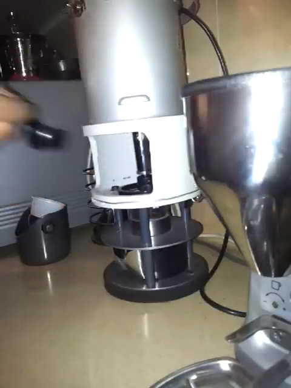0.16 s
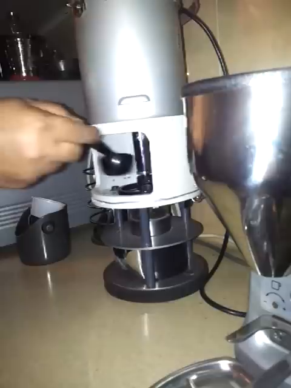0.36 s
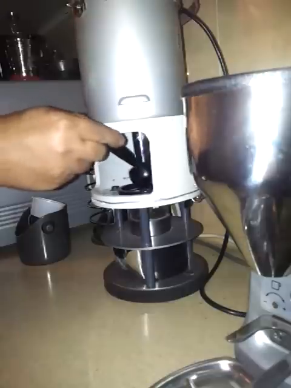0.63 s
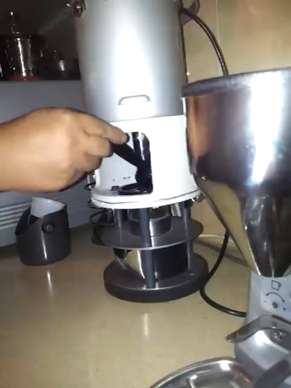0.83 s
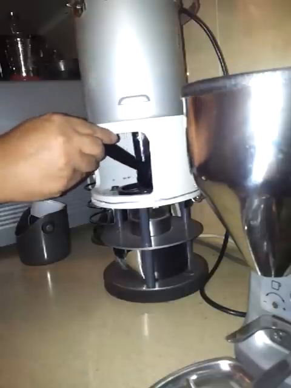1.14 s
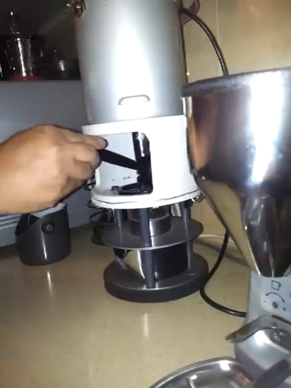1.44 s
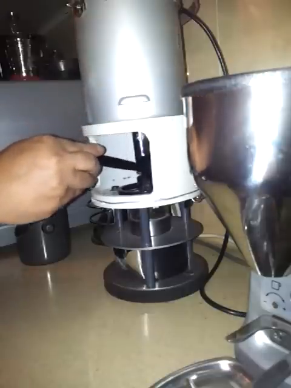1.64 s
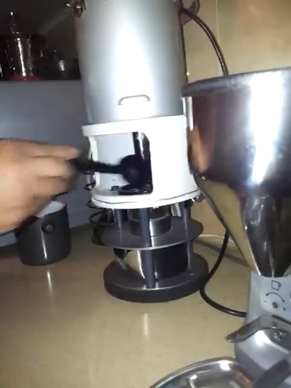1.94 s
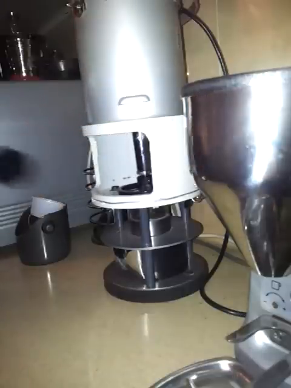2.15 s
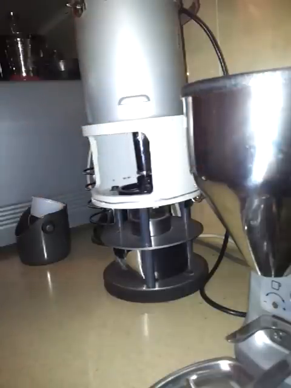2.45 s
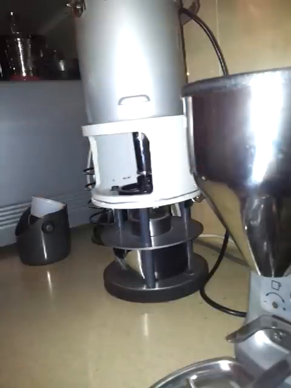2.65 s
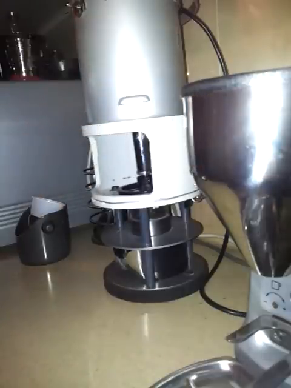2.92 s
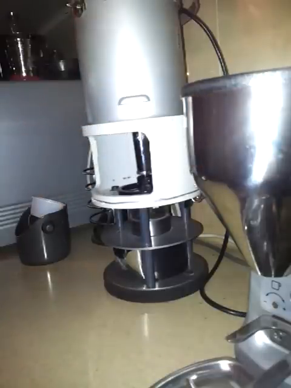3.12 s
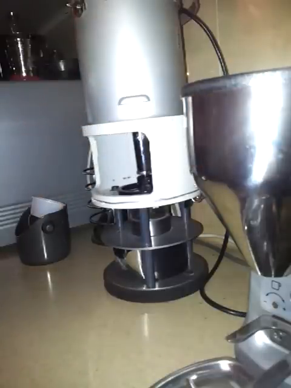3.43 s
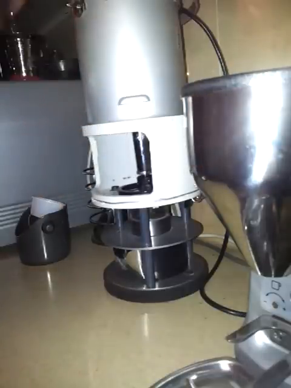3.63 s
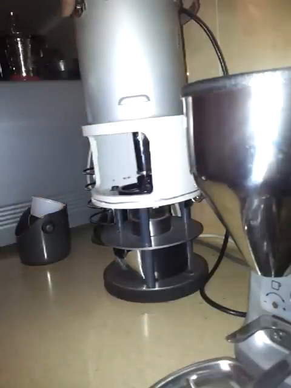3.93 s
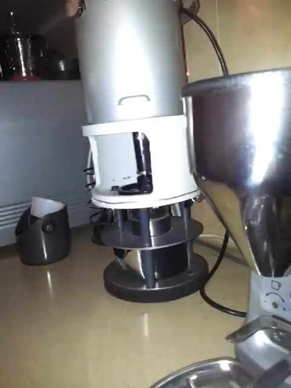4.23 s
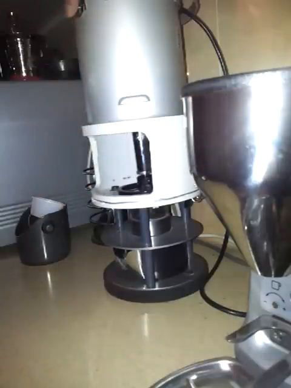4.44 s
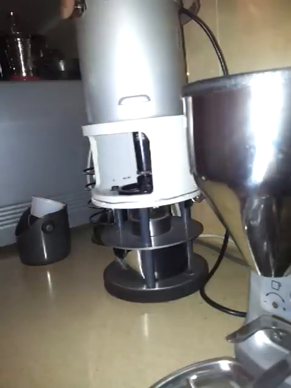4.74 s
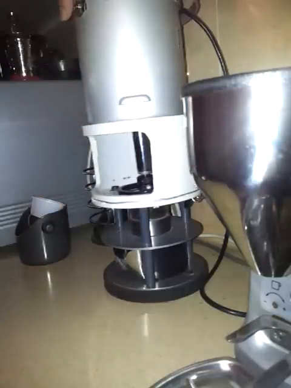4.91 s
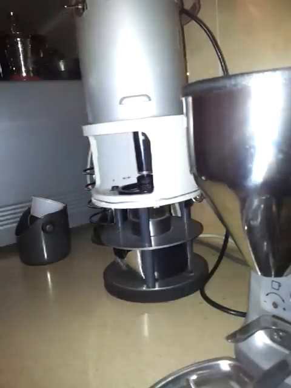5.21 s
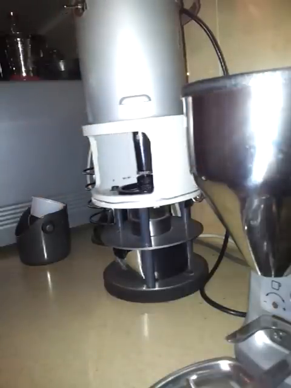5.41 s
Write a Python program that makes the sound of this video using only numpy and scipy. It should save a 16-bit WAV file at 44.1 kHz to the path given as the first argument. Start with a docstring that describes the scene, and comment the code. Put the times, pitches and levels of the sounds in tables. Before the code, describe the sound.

A plastic scoop scrapes and ticks, something thuds on the counter, steel clinks, then a coffee grinder snaps on with a harsh crunching drone.

```python
"""Coffee grinder at close range

Over soft hiss and hum, a plastic scoop rubs, skips and knocks: random slips and impulses excite short noise responses.
Thuds, steel clinks, taps and snaps follow as impulses exciting damped modes and decaying noise.
The motor then starts: a modulated gear tone drones ever louder and shaken housing resonances sound with it,
while random fractures make the crunch of the burrs, loud at first and slowly easing."""
import sys
import numpy as np
from scipy import signal
from scipy.fft import rfft, irfft, next_fast_len
from scipy.io import wavfile

SR = 44100
rng = np.random.default_rng(int(sys.argv[2]) if len(sys.argv) > 2 else 0)


def put_to_file(sound):
    """Save the sound as 16-bit audio at rate SR, in the file named by the first command-line argument."""
    columns = np.atleast_2d(sound).T  # one column per channel
    safe = np.clip(columns, -1, 1)
    whole_steps = np.round(safe * 32767)
    wavfile.write(sys.argv[1], SR, whole_steps.astype(np.int16))


N = 245637

# Event levels, mode levels and spectra are relative: each source applies its own gain.
# background hiss, its level moving slowly, before a common gain: [t/s, level/dB]
HISS = [(0.2, -49.5), (0.65, -51.5), (1.9, -50), (2.15, -48.5), (2.85, -48), (3.9, -49), (4.7, -52)]
# mains hum: [f/Hz, level/dB]
HUM = [(59.5, -67.5), (119.5, -67)]
# background hiss spectrum: [f/Hz, level/dB per Hz]
HISS_SPECTRUM = [(20, -2), (55, -1.5), (170, -2), (560, 0.5), (1300, -10.5), (2100, -11), (2500, -4),
                 (3300, -12), (5000, -7), (7000, -12.5), (11500, -14), (14500, -21.5)]

# scoop pushed in, then drawn out: [t/s of the hardest rub, level/dB, swell and fade/(dB/s)]
STROKES = [(1.221, -33.5, 82), (1.599, -28.5, 126)]
# single plastic ticks of the scoop: [t/s, level/dB]
TICKS = [(1.002, -23), (1.088, -19), (1.131, -19.5), (1.5078, -19), (1.5256, -12), (1.5606, -11.5),
         (1.5832, -11), (1.5978, -12), (1.7147, -18.5), (1.962, -30.5)]
# scoop knocking on the housing: [t/s, level/dB]
KNOCKS = [(0.7964, -32.5), (1.4431, -18)]
# spectra of scoop and knock: [f/Hz, level/dB per Hz]
SCOOP_SPECTRUM = [(1800, -29), (3300, -15.5), (5100, 3), (5800, -3.5), (6500, 2.5), (7400, -8), (9300, -3),
                  (11200, -2), (12300, -13), (14500, -12.5)]
KNOCK_SPECTRUM = [(900, -23), (1350, -9), (1750, -27), (2450, 6), (3050, 4), (3500, -18), (14000, -30)]
# the scoop rubs along the opening only between these times, in s
RUB_START_S, RUB_END_S = 0.99, 1.86
# even skips along the rim: first time and spacing in s, level and extra level of the first in dB
SKIP_START_S, SKIP_GAP_S = 1.1712, 0.0672
SKIP_DB, FIRST_CATCH_DB = -16.5, 8

# broadband snaps: a faint tick with the scoop's first knock, hard snaps,
# then the starting jolt: [t/s, level/dB]
SNAPS = [(0.7966, -34.5), (4.0745, -7), (4.077, -3.5), (4.080, -10.5), (4.7502, 0), (4.753, 1),
         (4.7575, 1.5)]
# spectrum of snaps and settling taps: [f/Hz, level/dB per Hz]
SNAP_SPECTRUM = [(70, -12), (250, -6.5), (550, -5), (2400, -8), (5500, 0), (8500, -3.5), (12000, -2.5),
                 (14500, -8.5)]

# dull blows on the counter: [t/s, level/dB]
THUDS = [(2.8732, -5.5), (2.884, -12.5), (3.023, -20.5)]
# booms of the counter top: [t/s, level/dB]
BOOMS = [(2.874, -32), (3.214, -25)]
# spectrum of a thud: [f/Hz, level/dB per Hz]
THUD_SPECTRUM = [(30, -45), (90, -7), (240, -5), (580, 2.5), (880, 1), (1400, -11.5), (2100, -19),
                 (2900, -36.5), (4300, -28.5), (6400, -36), (14000, -42.5)]
# modes of the counter top and the ware on it: [f/Hz, level/dB, t60/s]
COUNTER_MODES = [(443, 0.5, 1), (817, 4, 0.13)]

# steel parts meeting: [t/s, level/dB, favoured f/Hz]
CLINKS = [(3.157, -33.5, 1660), (3.1705, -11, 5050), (3.179, -11, 1560), (3.277, -12, 3230),
          (3.340, -14.5, 3400), (3.368, -26.5, 2640), (3.420, -22, 1540)]
# spectrum of a clink: [f/Hz, level/dB per Hz]
CLINK_SPECTRUM = [(120, -16), (390, -6), (900, -15.5), (2100, -27), (3200, -11.5), (3850, -23.5),
                  (5200, -8.5), (7000, -27.5), (11500, -13), (14500, -25.5)]
# modes of the steel: [f/Hz, level/dB, t60/s]
STEEL_MODES = [(1569.5, -0.5, 0.85), (1590, -4.5, 0.72), (2624, -8, 0.91), (3165, 4, 0.27),
               (3380, -4.5, 0.17), (5109, 0.5, 0.75), (5450, -1, 1), (10710, -7, 0.52)]
# loose parts settling: [t/s, level/dB]
TAPS = [(3.5892, -30.5), (3.86, -33.5), (4.37, -34.5), (4.5852, -38)]
# modes of the small loose parts: [f/Hz, level/dB, t60/s]
LOOSE_MODES = [(2990, -2, 0.27), (3990, -2, 0.18), (5630, 1, 0.39), (11500, -24, 0.13)]

# single hard cracks between the burrs: [t/s, level/dB]
CRACKS = [(4.752, -1), (4.809, -6.5), (4.904, -6), (4.926, -8.5)]
# a hard bean jams the burrs for a moment: [t/s, width at 1/e/s, crunch lift/dB, drone lift/dB]
BITES = [(4.82, 0.096, 2, 6), (4.978, 0.043, 5.5, 0), (5.103, 0.046, 2.5, 14), (5.217, 0.078, 4.5, 11.5),
         (5.292, 0.028, -0.5, 9.5), (5.393, 0.053, 3, 1)]
# spectra of the crunch and of its bright splinters: [f/Hz, level/dB per Hz]
CRUNCH_SPECTRUM = [(50, -7.5), (220, -2.5), (370, -4.5), (950, 1.5), (1800, -2), (2800, -2.5), (3900, -1),
                   (5000, -1), (6700, 0.5), (7700, -9), (14500, -27)]
SPLINTER_SPECTRUM = [(5000, -31), (8000, 3.5), (11000, 4), (12100, 2), (12700, 1), (14500, -14.5)]
# resonances of the burr carrier: [f/Hz, width at half lift/Hz, lift/dB]
CARRIER = [(3780, 200, 9), (5760, 140, 5.5), (6750, 320, 9.5), (12200, 260, -2)]
# resonances of the grinder housing: [f/Hz, half bandwidth of each of two filters/Hz, level/dB]
HOUSING = [(471.5, 10, -12), (518, 24, -3), (544, 24, -0.5), (595, 18, -4), (675, 21, -8), (1307, 78, -8.5)]
START_S = 4.78
MESH_HZ = 541.3  # rate at which the gear teeth meet
# levels at the start, and their trends
CRUNCH_DB, CRUNCH_EASE_DB_PER_S = -21.5, 3
SPLINTER_DB, SPLINTER_EASE_DB_PER_S = -26.5, 6
DRONE_DB, DRONE_GROWTH_DB_PER_S = -31.5, 5
# shares of the bite lifts passed on to the splinters
SPLINTER_FOLLOWS_CRUNCH, SPLINTER_FOLLOWS_DRONE = .4, 0.27

# the two microphone ports: [f/Hz, left-right level/dB] and [f/Hz, left-right correlation]
BALANCE = [(100, 7), (700, 6), (1280, -3), (2400, -2), (4500, -11.5), (8000, 0), (11500, 14), (14500, 11)]
LIKENESS = [(500, -0.62), (900, 0.21), (1400, 0.059), (3000, -0.0025)]
ROOM_T60_S, ROOM_TREBLE_T60_S, ROOM_SPLIT_HZ = 0.7, 0.54, 6200
CUTOFF_HZ = 14500


def from_db(db):
    """Decibel law: amplitude gain is 10^(dB/20)."""
    return 10 ** (np.asarray(db) / 20)


def rms_one(x):
    """Normalisation: the mean of the channels gets rms 1."""
    return x / np.sqrt(np.mean(np.atleast_2d(x).mean(0) ** 2) + 1e-20)


def in_time(rows):
    """Linear interpolation: each column of a curve at every sample."""
    s, *columns = np.transpose(rows)
    return [np.interp(np.arange(N) / SR, s, c) for c in columns]


def at_hz(points, hz):
    """Interpolation on a logarithmic frequency axis."""
    f, value = np.array(points).T
    return np.interp(np.log(hz + 1e-9), np.log(f), value)


def drift(rate):
    """Low-passed noise: a double pole at rate (Hz) gives slow fluctuation of rms 1."""
    step, settle = 40, 2000  # samples per slow step; slow steps dropped
    r = np.exp(-2 * np.pi * rate * step / SR)
    slow = signal.lfilter([1], [1, -2 * r, r * r], rng.standard_normal(N // step + settle + 2))[settle:]
    return np.interp(np.arange(N) / step, np.arange(len(slow)), rms_one(slow))


def dying(t60):
    """Exponential damping: one second of decay, falling 60 dB in t60."""
    return from_db(-60 * np.arange(SR) / SR / t60)


def ports(hz, turn):
    """Interchannel level and phase: complex gains of a wave whose phase differs by turn."""
    lean = from_db(at_hz(BALANCE, hz) / 2)
    return np.array([lean * np.ones_like(turn), np.exp(1j * turn) / lean])


def tone(hz, phase):
    """Sinusoid at two ports: the cosine of the phase difference is the correlation; rms 1."""
    turn = np.arccos(np.clip(at_hz(LIKENESS, hz), -1, 1))
    return rms_one(np.real(ports(hz, turn)[:, None] * np.exp(1j * phase)))


def noise(spectrum, size=N, peaks=()):
    """Spectral shaping: partly correlated stereo noise with resonant lifts; rms 1."""
    padded = next_fast_len(size)
    hz = np.fft.rfftfreq(padded, 1 / SR)
    lifts = sum(lift / (1 + (2 * (hz - f) / width) ** 2) for f, width, lift in peaks)
    level_db = at_hz(spectrum, hz) + lifts
    alike = np.clip(at_hz(LIKENESS, hz), -1, 1)
    mid, side = rfft(rng.standard_normal((2, padded)))
    pair = np.sqrt(1 + alike) * mid + np.sqrt(1 - alike) * side * [[1], [-1]]
    return rms_one(irfft(pair * from_db(level_db) * ports(hz, 0 * hz), padded)[:, :size])


def response(spectrum, t60, room_db, peaks=()):
    """Impulse response: dense damped modes, then a room tail whose treble dies first."""
    body, tail = noise(spectrum, SR, peaks), noise(spectrum, SR)
    lowpass = signal.butter(2, ROOM_SPLIT_HZ, fs=SR, output="sos")
    dull = signal.sosfiltfilt(lowpass, tail)
    room = dull * dying(ROOM_T60_S) + (tail - dull) * dying(ROOM_TREBLE_T60_S)
    onset = 1 - dying(0.0069)
    return (body * dying(t60) + from_db(room_db) * room) * onset


def clicks(events):
    """Impulsive excitation: one unit sample scaled by each row's level."""
    out = np.zeros(N)
    s, db = np.transpose(events)
    out[np.round(s * SR).astype(int)] = from_db(db)
    return out


def play(force, answer):
    """Linear superposition: a force is convolved with a body's stereo response."""
    return signal.fftconvolve(force[None], answer, axes=1)[:, :N]


def blows(events, spectrum, t60, room_db, gain_db):
    """Noise bursts: each blow gets a freshly drawn response, any favoured pitch lifted."""
    out = np.zeros((2, N + SR))
    pitch_width_hz, pitch_lift_db = 220, 13
    for s, db, *pitch in events:
        at = round(s * SR)
        peaks = [(hz, pitch_width_hz, pitch_lift_db) for hz in pitch]
        out[:, at:at + SR] += from_db(db + gain_db) * response(spectrum, t60, room_db, peaks)
    return out[:, :N]


def ringing(events, modes, gain_db):
    """Modal decay: modes near a favoured pitch ring strongest; reflections make each waver."""
    out, t = 0, np.arange(SR) / SR
    away_db, reach_hz = -8, 200
    for hz, db, t60 in modes:
        hits = []
        for s, level_db, *pitch in events:
            loss_db = sum(away_db * np.tanh(abs(hz - f) / reach_hz) for f in pitch)
            hits.append((s, level_db + loss_db))
        # real part wavers the phase, imaginary part the amplitude
        waver = .7 * drift(22)[:SR] + .4j * drift(22)[:SR]
        mode = tone(hz, 2 * np.pi * hz * t + waver) * dying(t60)
        out = out + from_db(db + gain_db) * play(clicks(hits), mode)
    return out


def grains(per_s, spread_db):
    """Random point process: many weak impulses, a few strong, of either sign."""
    sizes_db = spread_db * np.minimum(rng.exponential(1, N), 4)
    sizes = from_db(sizes_db) * rng.choice([-1, 1], N)
    return sizes * (rng.random(N) < per_s / SR)


def kitchen():
    """Background: broadband hiss of slowly changing level plus sinusoidal mains hum."""
    t = np.arange(N) / SR
    hum = sum(from_db(db) * tone(hz, 2 * np.pi * hz * t) for hz, db in HUM)
    return hum + from_db(in_time(HISS)[0] - 1.5) * noise(HISS_SPECTRUM)


def scoop_ticks(count=4):
    """Periodic catching: even skips along the rim, the first hardest, plus single ticks."""
    skips = []
    for k in range(count):
        skips.append((SKIP_START_S + k * SKIP_GAP_S, SKIP_DB + FIRST_CATCH_DB * (k == 0)))
    return skips + TICKS


def scoop(draws=3):
    """Stick-slip friction: tiny random slips, with ticks on edges and housing knocks."""
    t = np.arange(N) / SR
    strokes = sum(from_db(db - fade * abs(t - s)) for s, db, fade in STROKES)
    rubbing = strokes * (t > RUB_START_S) * (t < RUB_END_S)
    slips = 0
    for draw in range(draws):  # several random responses even out the colour
        body = response(SCOOP_SPECTRUM, t60=0.022, room_db=-19.5)
        slips = slips + play(grains(per_s=150, spread_db=6.0), body)
    ticks = blows(scoop_ticks(), SCOOP_SPECTRUM, t60=0.049, room_db=-16.5, gain_db=-9.5)
    knocks = blows(KNOCKS, KNOCK_SPECTRUM, t60=0.059, room_db=-21, gain_db=-2.0)
    return rubbing * rms_one(slips) + ticks + knocks


def snaps():
    """Broadband impact: brief contacts excite a wide, quickly damped spectrum."""
    return blows(SNAPS, SNAP_SPECTRUM, t60=0.05, room_db=-19.5, gain_db=-6.0)


def counter():
    """Plate excitation: dull blows ring modes; a low boom swells for a cycle or two and dies."""
    boom_hz, swell_s = 103, .015
    t = np.arange(SR) / SR
    hump = (t / swell_s * np.exp(1 - t / swell_s)) ** 2
    hump = hump + 0.24 * (dying(0.91) - dying(0.061))  # faint longer ring
    boom = tone(boom_hz, 2 * np.pi * boom_hz * t) * hump
    thuds = blows(THUDS, THUD_SPECTRUM, t60=0.098, room_db=-13.0, gain_db=-2.5)
    modes = ringing(THUDS, COUNTER_MODES, gain_db=-25.5)
    return thuds + modes + from_db(-1.0) * play(clicks(BOOMS), boom)


def steel():
    """Lightly damped modes: bright clashes set steel ringing; small parts tap as they settle."""
    clashes = blows(CLINKS, CLINK_SPECTRUM, t60=0.07, room_db=-7.5, gain_db=-8.0)
    clinks = clashes + ringing(CLINKS, STEEL_MODES, gain_db=-14.0)
    contacts = blows(TAPS, SNAP_SPECTRUM, t60=0.11, room_db=-21.0, gain_db=-10)
    taps = contacts + ringing(TAPS, LOOSE_MODES, gain_db=-14)
    return clinks + taps


def load():
    """Load dependence: crunch, splinter and drone levels in dB, a trend plus a surge per bite."""
    t = np.arange(N) / SR
    run_s = np.maximum(t - START_S, 0)
    crunch_lift = drone_lift = 0
    for s, length, crunch_db, drone_db in BITES:
        surge = np.exp(-(2 * (t - s) / length) ** 2)
        crunch_lift = crunch_lift + crunch_db * surge
        drone_lift = drone_lift + drone_db * surge
    splinter_lift = SPLINTER_FOLLOWS_CRUNCH * crunch_lift + SPLINTER_FOLLOWS_DRONE * drone_lift
    return (CRUNCH_DB - CRUNCH_EASE_DB_PER_S * run_s + crunch_lift,
            SPLINTER_DB - SPLINTER_EASE_DB_PER_S * run_s + splinter_lift,
            DRONE_DB + DRONE_GROWTH_DB_PER_S * run_s + drone_lift)


def burrs(crunch_db, splinter_db, draws=5):
    """Brittle fracture: pressure-modulated random breaks crunch and splinter."""
    tooth_hz, tooth_db, clump_db = 46, 1.3, 1.3
    passing = np.sin(2 * np.pi * tooth_hz * np.arange(N) / SR + drift(2.7))
    pressure = from_db(tooth_db * passing + clump_db * drift(36))
    crunch = splinters = 0
    for draw in range(draws):  # several random responses even out the colour
        fractures = grains(per_s=600, spread_db=3.5) * pressure
        dull_body = response(CRUNCH_SPECTRUM, t60=0.021, room_db=-19.5, peaks=CARRIER)
        bright_body = response(SPLINTER_SPECTRUM, t60=0.029, room_db=-18.5, peaks=CARRIER)
        crunch = crunch + play(fractures, dull_body)
        splinters = splinters + play(fractures, bright_body)
    cracks = blows(CRACKS, CRUNCH_SPECTRUM, t60=0.044, room_db=-15.0, gain_db=-4)
    return from_db(crunch_db) * rms_one(crunch) + from_db(splinter_db) * rms_one(splinters) + cracks


def gears(drone_db):
    """Modulation and resonance: the mesh tone wavers and throbs; chatter shakes the housing."""
    t = np.arange(N) / SR
    throb_hz, throb = 47, .35
    wander = .55 * drift(14)  # phase in radians
    swell = 1 + throb * np.sin(2 * np.pi * throb_hz * t + 2.0 * drift(4.5)) + 0.12 * drift(44)
    mesh = from_db(drone_db) * swell * tone(MESH_HZ, 2 * np.pi * MESH_HZ * t + wander)
    chatter = noise([(200, 18.5), (450, -4), (1400, -11), (2500, 6)])  # f/Hz, level/dB per Hz
    shake = 0
    for hz, width, db in HOUSING:
        peak = signal.iirpeak(hz, hz / (2 * width), fs=SR)
        resonance = signal.lfilter(*peak, signal.lfilter(*peak, chatter))
        shake = shake + from_db(db) * rms_one(resonance)
    return mesh + from_db(-27.0) * shake


def grinder():
    """Switched excitation: burrs and gears rise linearly to full level in 5.3 ms."""
    crunch_db, splinter_db, drone_db = load()
    running = np.clip((np.arange(N) / SR - START_S) / 0.0053, 0, 1)
    return running * (burrs(crunch_db, splinter_db) + gears(drone_db))


def scene():
    """Superposition: the pressures of all sources add."""
    return kitchen() + scoop() + snaps() + counter() + steel() + grinder()


def record(dry):
    """Saturation and band limiting: peaks are rounded, then the top is cut by a low-pass."""
    top = 1.06
    rounded = top * np.tanh(dry / top)
    lowpass = signal.ellip(10, .3, 70, CUTOFF_HZ, fs=SR, output="sos")
    return signal.sosfilt(lowpass, rounded)


dry = scene()
out = record(dry)
put_to_file(out)
```